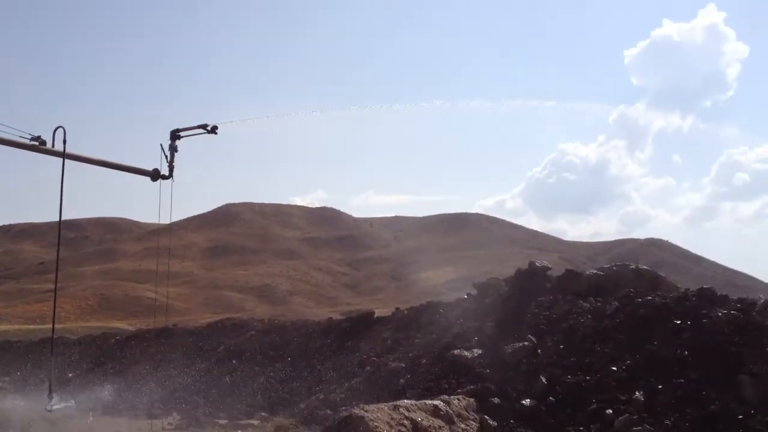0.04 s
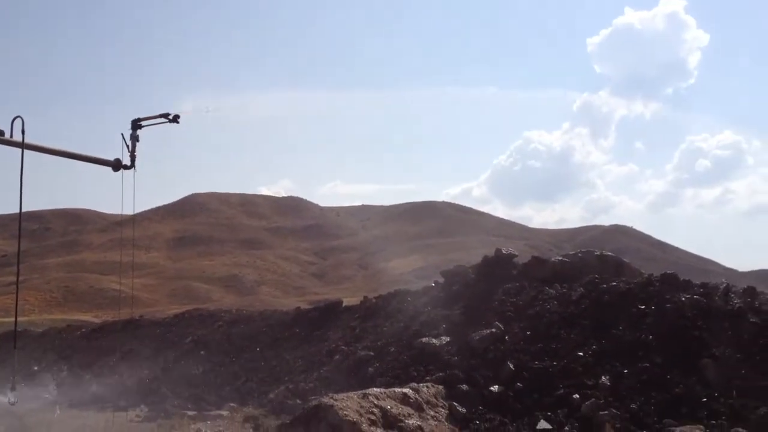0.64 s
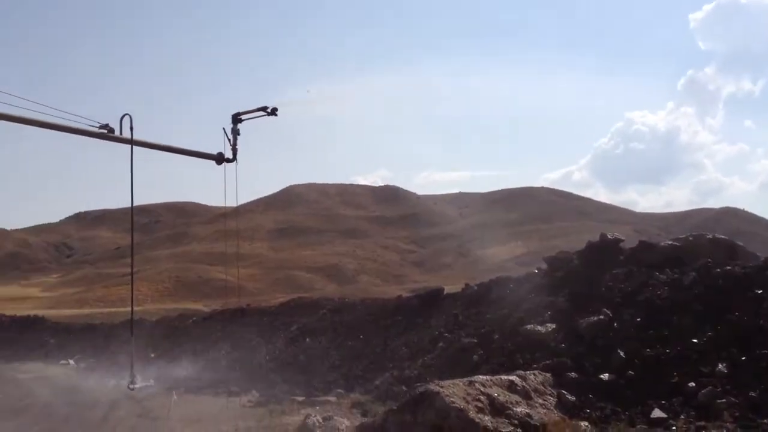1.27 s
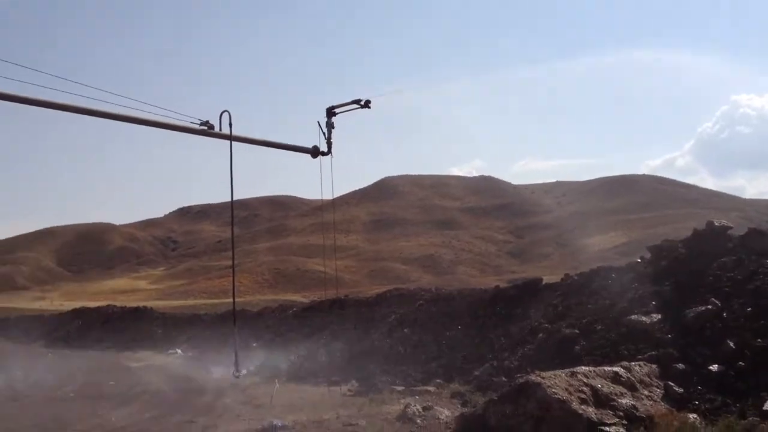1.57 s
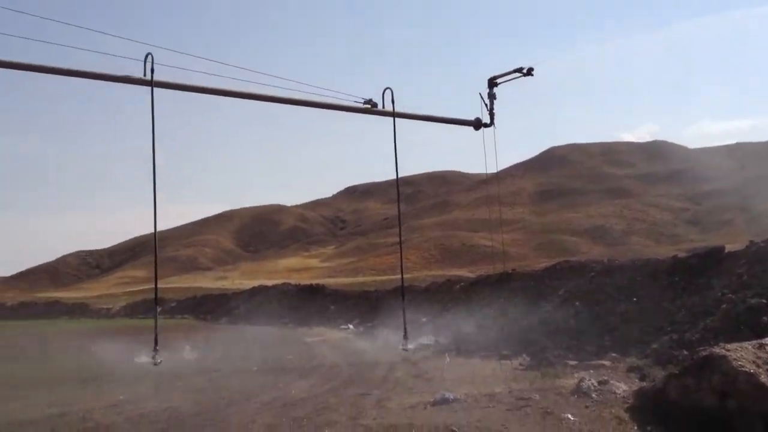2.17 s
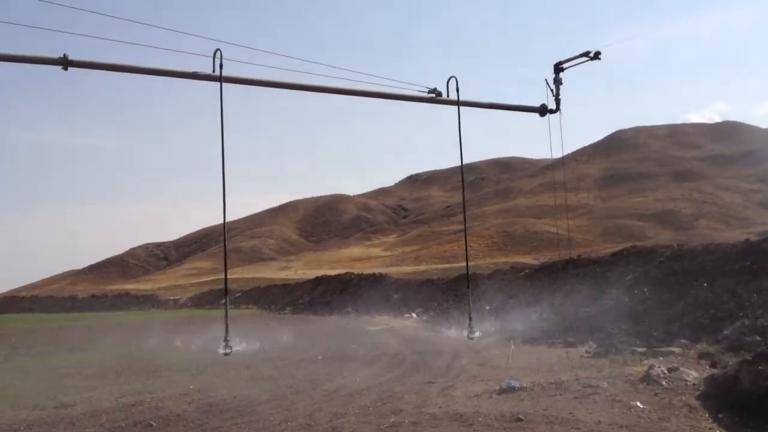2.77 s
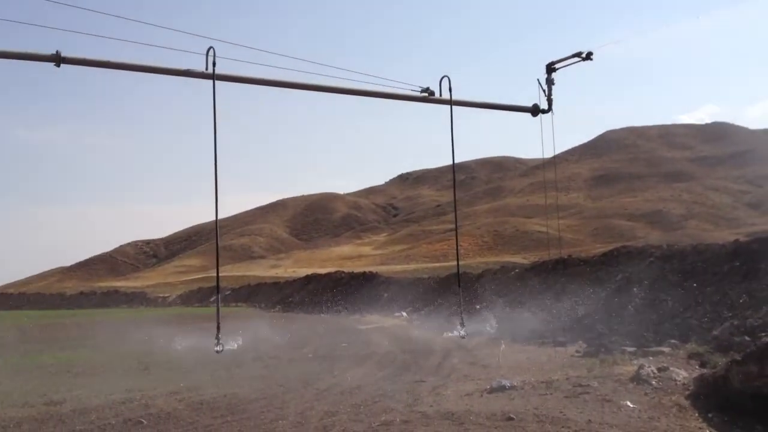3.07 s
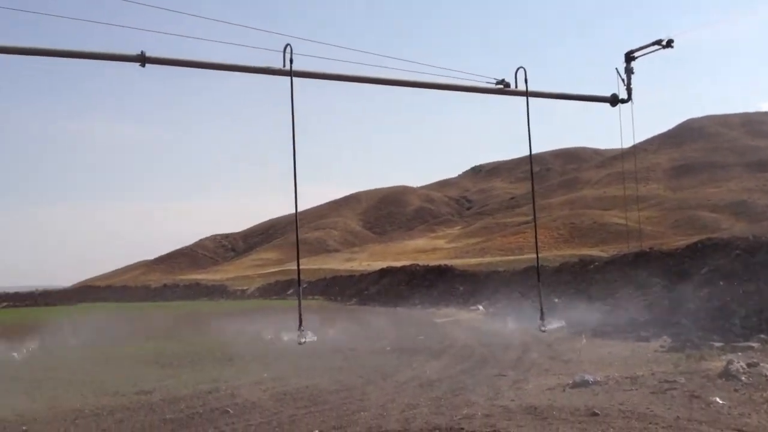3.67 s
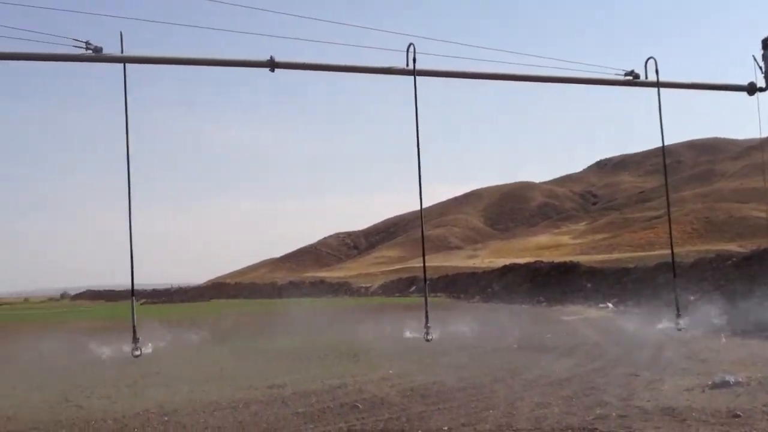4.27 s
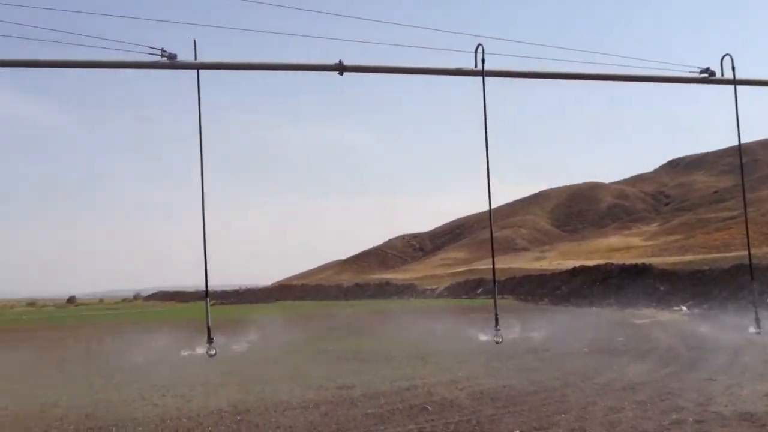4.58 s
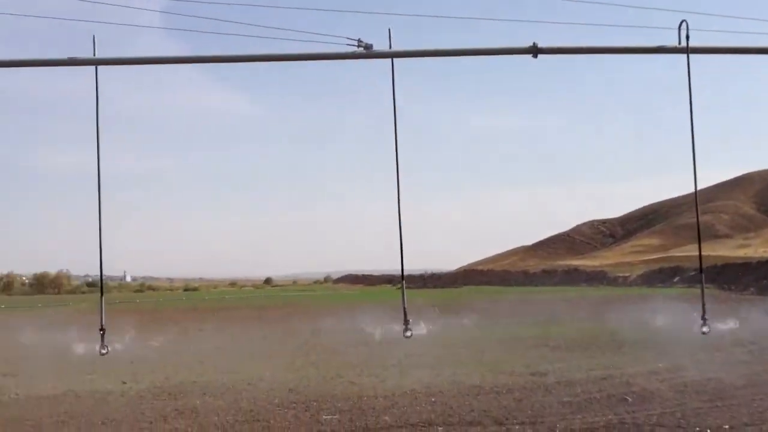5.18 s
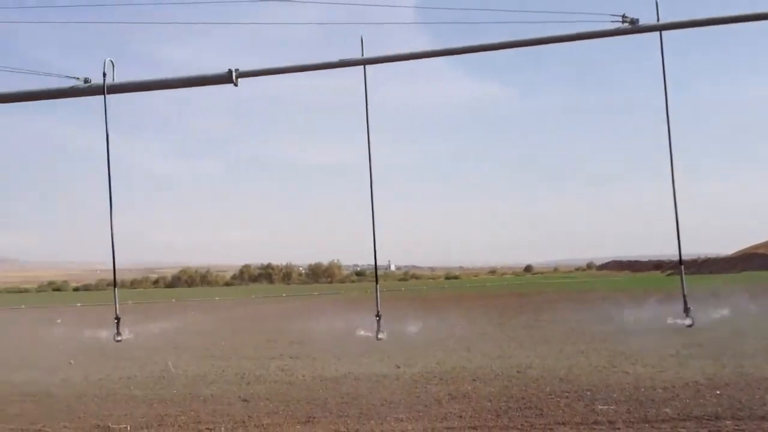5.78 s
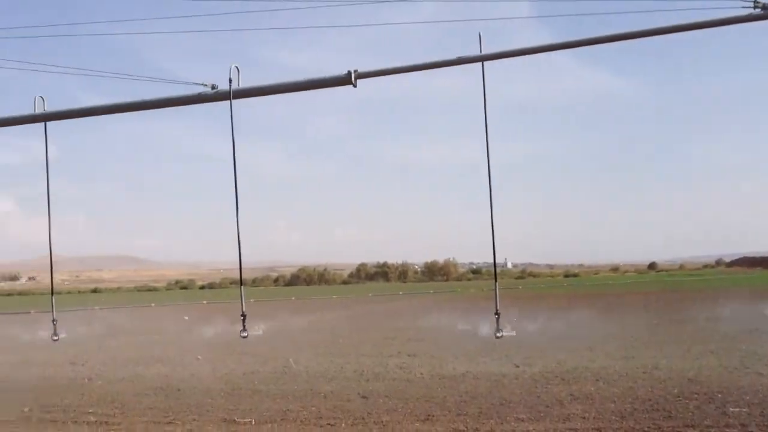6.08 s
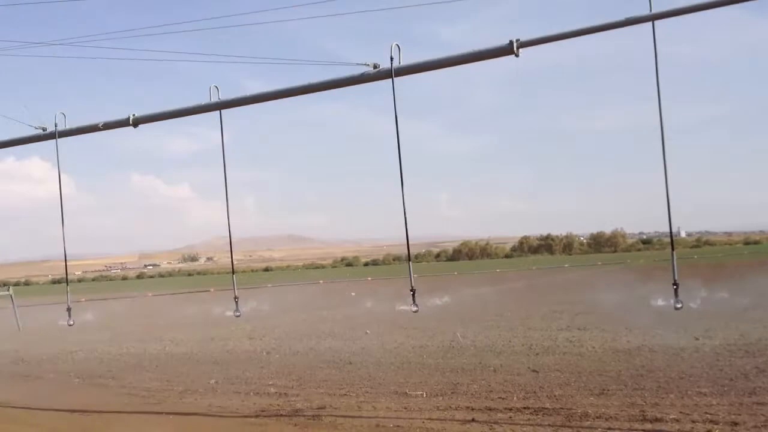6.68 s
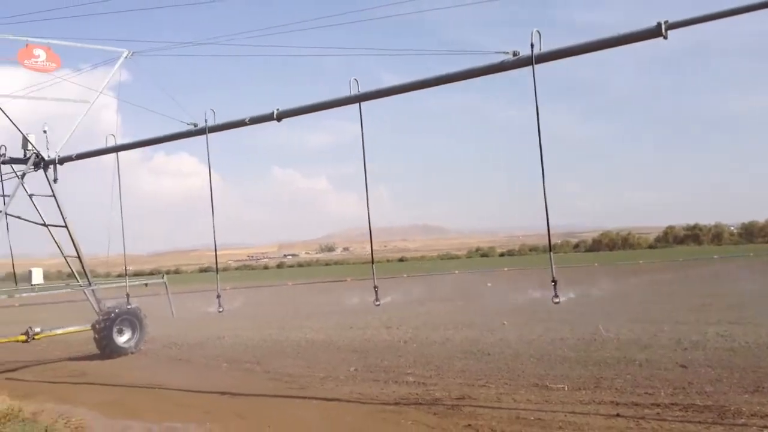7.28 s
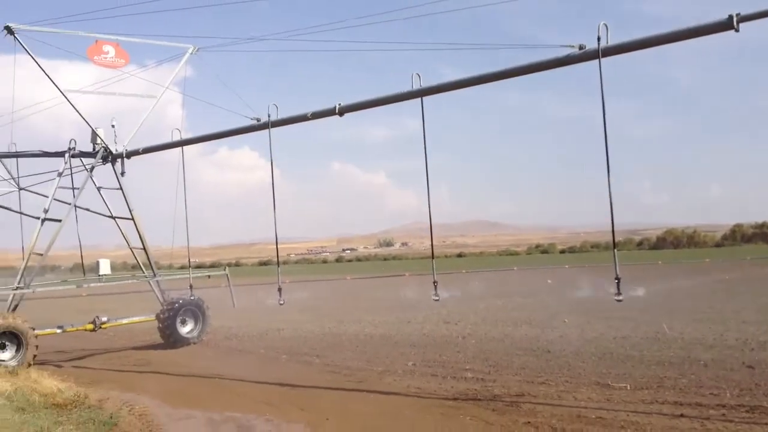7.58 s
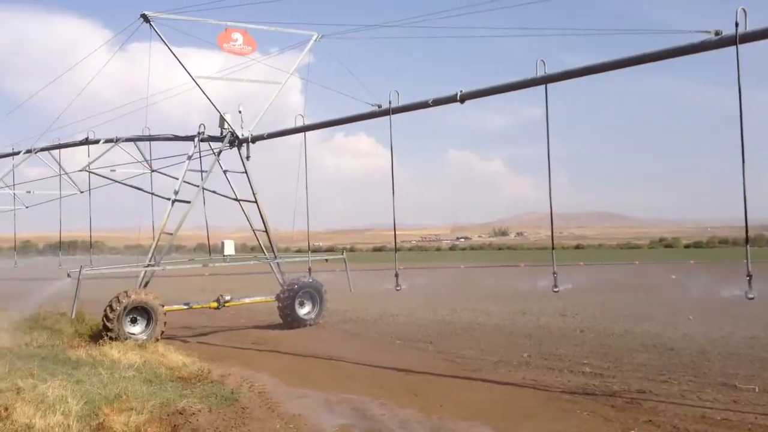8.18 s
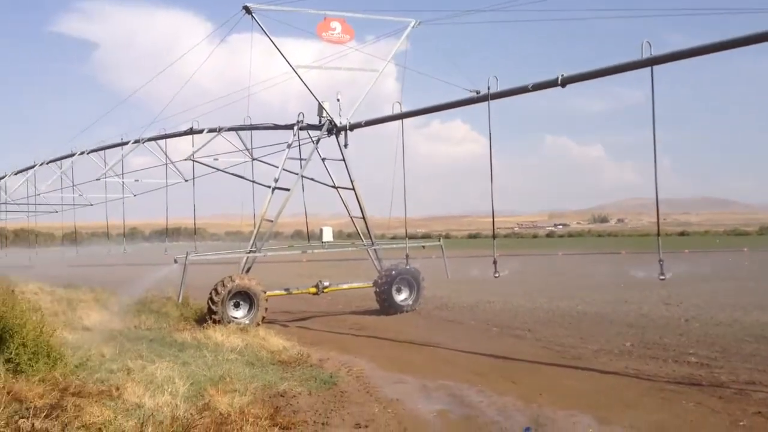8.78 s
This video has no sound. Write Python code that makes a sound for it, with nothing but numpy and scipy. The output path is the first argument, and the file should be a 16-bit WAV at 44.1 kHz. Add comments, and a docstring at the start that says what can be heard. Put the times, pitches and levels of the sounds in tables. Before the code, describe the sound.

In an open field, a bright, fluttering hiss of irrigation spray runs throughout, above fine patter on soil and a low rush of water in pipework. Early on, the hand-held mono microphone picks up slight wind bumps and two soft handling knocks. As it turns from the sprinkler, the hiss softens a little, and a faint, wavering pump hum comes and goes far off.

```python
"""Pivot irrigator in an open field.

Nozzles hiss and sputter, drops patter on wet soil, water rushes and rings in the pipework.
The spray dulls as a hand-held mono microphone turns away from the end sprinkler.
A pump hums faintly far off; a light breeze and the hand now and then bump the microphone."""
import sys
import numpy as np
from scipy import signal
from scipy.fft import rfft, irfft
from scipy.io import wavfile

SR = 44100
rng = np.random.default_rng(int(sys.argv[2]) if len(sys.argv) > 2 else 0)


def log_audio(samples):
    """Write samples as a 16-bit WAV file to the path given in sys.argv[1]."""
    # one column per channel
    frames = np.atleast_2d(samples).T
    # limit to full scale, then quantise
    limited = np.clip(frames, -1, 1)
    pcm = np.round(limited * 32767).astype(np.int16)
    wavfile.write(sys.argv[1], SR, pcm)


N = 389844
TIME_S = np.arange(N) / SR
BINS_HZ = np.maximum(np.arange(N // 2 + 1) * SR / N, 1)


def undb(db):
    """Decibels to gain."""
    return 10 ** (np.asarray(db) / 20)


def unit(x):
    """Scale to rms 1."""
    return x / np.sqrt(np.mean(x ** 2))


def curves(rows):
    """Columns of a timed table, linearly interpolated."""
    times_s, *columns = np.transpose(rows)
    return [np.interp(TIME_S, times_s, column) for column in columns]


def swells(rows):
    """Sum of Gaussian level changes, in dB."""
    return sum(db * np.exp(-((TIME_S - centre_s) / half_s) ** 2) for centre_s, db, half_s in rows)


def noise():
    """White noise."""
    return rng.standard_normal(N)


def walk(rate_hz):
    """Random drift of spread 1, mostly below rate_hz."""
    hop = 32
    pushes = rng.standard_normal(N // hop + 2)
    lowpass = signal.butter(2, min(rate_hz * hop / SR * 2, 0.9), output="sos")
    slow = unit(signal.sosfilt(lowpass, pushes))
    return np.interp(np.arange(N), np.arange(len(slow)) * hop, slow)


def flutter(low_hz, high_hz):
    """Random trembling of spread 1 between two rates."""
    highpass = signal.butter(2, low_hz, "high", fs=SR, output="sos")
    return unit(signal.sosfilt(highpass, walk(high_hz)))


def colour(x, spectrum):
    """Filter by (freq_hz, gain_db) points; rms 1."""
    hz, db = np.transpose(spectrum)
    gain = undb(np.interp(np.log(BINS_HZ), np.log(hz), db))
    return unit(irfft(rfft(x) * gain, N))


def resonate(x, hz, width_hz):
    """One resonance; rms 1."""
    return unit(signal.lfilter(*signal.iirpeak(hz, hz / width_hz, fs=SR), x))


def bands(x, centres_hz):
    """Overlapping bands that sum to x."""
    spectrum = rfft(x)
    return [irfft(spectrum * np.interp(BINS_HZ, centres_hz, one), N) for one in np.eye(len(centres_hz))]


def tone(hz):
    """Sine following a pitch; rms 1."""
    return np.sqrt(2) * np.sin(2 * np.pi * np.cumsum(hz) / SR)


def narrow_noise(hz, half_width_hz):
    """Noise band following a pitch; rms 1."""
    envelope = walk(half_width_hz) + 1j * walk(half_width_hz)
    return np.real(envelope * np.exp(2j * np.pi * np.cumsum(hz) / SR))


def drops(per_s, scatter_db):
    """Random clicks, many small, a few large; rms 1."""
    lands = rng.random(N) < per_s / SR
    size = undb(scatter_db * np.minimum(rng.exponential(size=N), 5.5))
    return unit(lands * size * np.sign(noise()))


def jets(away):
    """Jets shatter on deflectors; the water sheets flap, so the hiss flutters band by band."""
    # mist spectrum: freq_hz, gain_db
    mist_spectrum = [(500, -62), (2500, -30), (4200, -12.5), (5400, -5), (6100, -2), (6600, -0.8),
                     (7200, 0), (7900, 1), (8800, -1.1), (9900, -3.5), (11000, -2), (12000, -1),
                     (13500, -1), (15400, -4.5)]
    # nozzle resonances: freq_hz, width_hz, below_spray_db
    nozzle_modes = [(4700, 520, 22), (6120, 130, 19.5), (6586, 130, 18.5)]
    # brief swells and dips: centre_s, change_db, half_length_s
    hiss_swells = [(0.25, 0.5, .05), (1.42, 0.5, .02), (2.95, 1.3, 0.073), (4.14, -2, 0.036),
                   (4.52, 0, 0.027)]
    level_db = -41.5 - 4 * away + swells(hiss_swells)
    treble_db = -4 * (away - away.mean())
    mist = colour(noise() + undb(-4.5) * drops(per_s=9000, scatter_db=4), mist_spectrum)
    centres_hz = np.linspace(3000, 15000, 11)
    sputter_db = 0.2 * flutter(low_hz=7, high_hz=16) + 0.47 * walk(rate_hz=110)
    flaps = [flutter(low_hz=4.4, high_hz=24) for _ in range(len(centres_hz) + 1)]
    out = np.zeros(N)
    for hz, width_hz, below_db in nozzle_modes:
        out += resonate(noise(), hz, width_hz) * undb(1.1 * flutter(low_hz=4.8, high_hz=18) - below_db)
    for k, (hz, band) in enumerate(zip(centres_hz, bands(mist, centres_hz))):
        depth_db = 0.74 + 0.32 * np.exp(-((hz - 8000) / 2000) ** 2)  # deepest at the hiss peak
        flap_db = depth_db * (flaps[k] + flaps[k + 1])
        directivity = np.interp(hz, [7000, 11500], [0, 1])  # short waves fade first off axis
        out += band * undb(sputter_db + flap_db + directivity * treble_db)
    return out * undb(level_db)


def patter(away):
    """Drops hit wet soil in uneven handfuls, over a wide area, so they fade late in the turn."""
    # impact spectrum: freq_hz, gain_db
    soil_spectrum = [(60, -50), (500, -19), (1200, -6), (1700, -1.5), (2050, -1), (2500, 0.5), (3000, 1),
                     (3700, 0.5), (4800, 0.5), (5600, -4), (8000, -4.5), (15000, -20)]
    level_db = -52 - 5.5 * away ** 2
    turn_db = level_db - level_db.mean()
    impacts = colour(drops(per_s=6000, scatter_db=1.5) + undb(-5) * noise(), soil_spectrum)
    centres_hz = np.geomspace(900, 7000, 9)
    out = np.zeros(N)
    for hz, band in zip(centres_hz, bands(impacts, centres_hz)):
        splash_db = 2.1 * walk(rate_hz=15)
        directivity = np.interp(hz, [1500, 3000], [0, 1])  # long waves arrive at any angle
        out += band * undb(splash_db + directivity * turn_db)
    return out * undb(level_db.mean())


def with_ground_echo(x, lag_s, sway, echo_db):
    """Add a ground reflection; its path sways with the microphone and ripples the colour."""
    delay_s = lag_s * (1 + sway * walk(rate_hz=0.4))
    oversampled = signal.resample_poly(x, 2, 1)
    echo = np.interp(TIME_S - delay_s, np.arange(2 * N) / (2 * SR), oversampled)
    return x + undb(echo_db) * echo


def hollow_rush(angle_deg):
    """Falling water: one hollow band that surges, and rises in pitch as the microphone turns."""
    # surges: centre_s, rise_db, half_length_s
    surges = [(2.75, 6.5, 0.22), (3.7, 5.5, .2), (4.45, 3, 0.25), (5.2, 7, 0.33), (6.3, 5.5, .28),
              (7.97, 7, 0.3), (8.7, 7, 0.24)]
    facing_hz, hz_per_deg = 961.5, 1.0
    band = narrow_noise(facing_hz + hz_per_deg * angle_deg, half_width_hz=155)
    return band * undb(-68 + swells(surges))


def pipework(away):
    """Turbulent water rushes in the pipes and stirs resonances, which fade a little in the turn."""
    # flow spectrum: freq_hz, gain_db
    flow_spectrum = [(25, -52), (60, -27), (100, -16.5), (145, -2), (220, 0), (275, -2), (330, -0.5),
                     (400, -5.5), (450, -2.5), (520, 1.5), (790, 0.5), (950, -4), (1400, -7.5), (3000, -39)]
    # pipe resonances: freq_hz, width_hz, level_db
    pipe_modes = [(150, 26, -79), (213, 44, -72.5), (524, 36, -68.5), (796, 91, -69.5), (1660, 96, -69.5)]
    rush = colour(noise(), flow_spectrum) * undb(-57 + 0.15 * walk(rate_hz=3.9))
    rings = sum(resonate(noise(), hz, width_hz) * undb(db + 2.2 * walk(rate_hz=2))
                for hz, width_hz, db in pipe_modes)
    highpass = signal.butter(3, 130, "high", fs=SR, output="sos")  # narrow pipes radiate no deep bass
    return rush + signal.sosfilt(highpass, rings) * undb(-3 * away)


def rough_whistle(away):
    """A rough whistle near 2.3 kHz stutters and swells briefly; a weaker ring emerges in the turn."""
    # brief swells: centre_s, rise_db, half_length_s
    whistle_swells = [(0.01, 6, .04), (0.5, 5, .04), (1.62, 5, 0.034), (1.74, 8, .03), (2.25, 9, .028),
                      (2.33, 9.5, .04), (2.55, 9, .06), (2.68, 6, .035), (2.78, 8.5, 0.041), (3.07, 4, .04),
                      (3.27, 9, 0.037), (3.41, 7, .03), (3.62, 9, 0.078), (3.83, 10, .075), (4.32, 7, .04),
                      (5.8, 3, 0.11), (6.26, 3, .04), (6.5, 0, .06), (7.12, 2, .11), (7.56, 4, .06),
                      (7.88, 7, .04), (8.2, 4, .09), (8.7, 6, .09)]
    stutter_db = 2 * flutter(low_hz=9, high_hz=30)
    level_db = -65 + 2.5 * away ** 2 + stutter_db
    pitch_hz = 2282 + 24.01 * walk(rate_hz=14.2)
    whistle = narrow_noise(pitch_hz, half_width_hz=44) * undb(swells(whistle_swells))
    upper_ring = narrow_noise(pitch_hz + 547, half_width_hz=32) * undb(-6) * away
    return (whistle + upper_ring) * undb(level_db)


def pump():
    """Distant hum gliding with pump speed, plus a steady upper tone; both waver in the air."""
    # hum: time_s, pitch_hz, level_db
    hum_track = [(0, 329, -78), (4.64, 330, -81), (4.67, 331, -64), (4.82, 342, -67), (4.97, 351, -64.5),
                 (5.17, 346, -73), (5.3, 338, -66), (5.42, 336, -77), (6.0, 322, -76), (7.1, 328, -76),
                 (7.35, 331, -68), (7.6, 328, -80), (7.77, 314, -68), (8.1, 333, -72), (8.45, 329, -78),
                 (8.6, 331, -65), (8.72, 340, -67), (8.84, 344, -62.5)]
    pitch_hz, level_db = curves(hum_track)
    hum = tone(pitch_hz * (1 + 0.0034 * walk(rate_hz=11))) * undb(level_db + walk(rate_hz=11))
    upper_hz = 539 * (1 + 0.0092 * walk(rate_hz=13))
    return hum + tone(upper_hz) * undb(-79 + 2.7 * walk(rate_hz=3))


def breeze():
    """Eddies rumble on the microphone until a lull; each bump is a few low cycles in a turbulent puff."""
    # eddy spectrum: freq_hz, gain_db
    rumble_spectrum = [(20, -17), (45, -10), (70, 0), (110, 4.5), (170, 2.5), (400, -34)]
    # soft bumps: centre_s, pitch_hz, peak_db, half_length_s
    bumps = [(0.717, 130, -59, .014), (0.95, 140, -60, .014), (1.573, 115, -57, 0.012),
             (2.213, 135, -58, 0.011), (2.647, 118, -51, 0.0073), (2.86, 152, -53, 0.01),
             (3.045, 134, -57, 0.014), (3.337, 102, -58, 0.016), (3.344, 225, -56, 0.015),
             (3.883, 90, -60, 0.018), (4.036, 80, -62, 0.012), (4.623, 211, -59, .025)]
    breeze_db, lull_db, lull_s, fade_s = -76.5, -95, 5.1, 0.25
    blowing = np.clip((lull_s - TIME_S) / fade_s, 0, 1)
    gust_db = 2.9 * blowing * walk(rate_hz=3.4)
    level_db = lull_db + (breeze_db - lull_db) * blowing + gust_db
    eddies = colour(noise(), rumble_spectrum)
    out = eddies * undb(level_db + 3.7 * walk(rate_hz=23))
    for (centre_s, hz, db, half_s), phase in zip(bumps, rng.random(len(bumps))):
        near = np.abs(TIME_S - centre_s) < 4 * half_s
        t = TIME_S[near] - centre_s
        push = np.sin(2 * np.pi * (hz * t + phase)) + undb(-25) * eddies[near]
        out[near] += undb(db) * np.exp(-(t / half_s) ** 2) * push
    return out


def knocks():
    """The hand knocks softly on the microphone housing; its modes die fast."""
    # knocks: start_s, gain_db
    hits = [(2.457, -41.5), (2.569, -47)]
    # housing modes: freq_hz, gain_db, t60_s
    housing_modes = [(270, 0, 0.089), (335, -3, .06), (525, -8, .12), (770, -10, .06), (943, -3, 0.094),
                     (1250, -13, .08)]
    attack_s = 0.0044
    out = np.zeros(N)
    for start_s, gain_db in hits:
        t = np.maximum(TIME_S - start_s, 0)
        body = sum(np.sin(2 * np.pi * hz * t) * undb(db - 60 * t / t60_s)
                   for hz, db, t60_s in housing_modes)
        out += undb(gain_db) * (1 - np.exp(-t / attack_s)) * body
    return out


def scene():
    """Open-air mix, the same in both channels."""
    # microphone heading off the end sprinkler: time_s, angle_deg
    turn = [(0, 1), (2.9, 35), (3.2, 48), (5.5, 73), (6.7, 103), (7.3, 130), (8.84, 125)]
    angle_deg, = curves(turn)
    away = (1 - np.cos(np.radians(angle_deg))) / 2  # 0 facing the sprinkler, 1 with it behind
    spray = jets(away) + with_ground_echo(patter(away), lag_s=0.002102, sway=0.086, echo_db=-13)
    water = spray + hollow_rush(angle_deg) + pipework(away)
    mono = water + rough_whistle(away) + pump() + breeze() + knocks()
    return np.array([mono, mono])


def record(dry):
    """Steep low-pass on the top treble."""
    cutoff_hz = 15350
    return signal.sosfilt(signal.ellip(12, 0.1, 70, cutoff_hz, fs=SR, output="sos"), dry)


dry = scene()
out = record(dry)
log_audio(out)
```